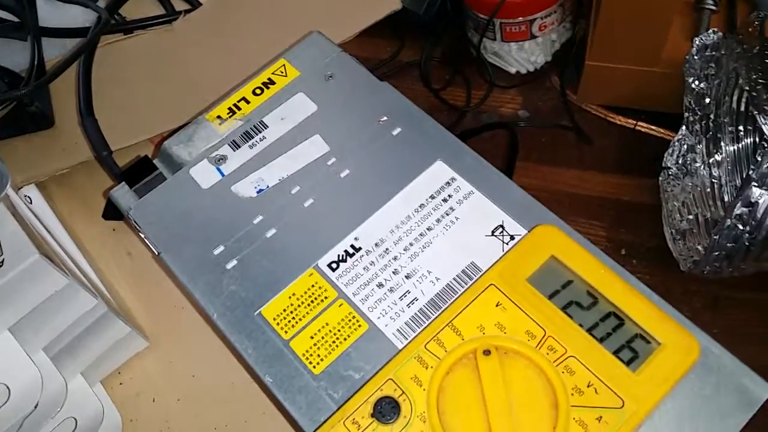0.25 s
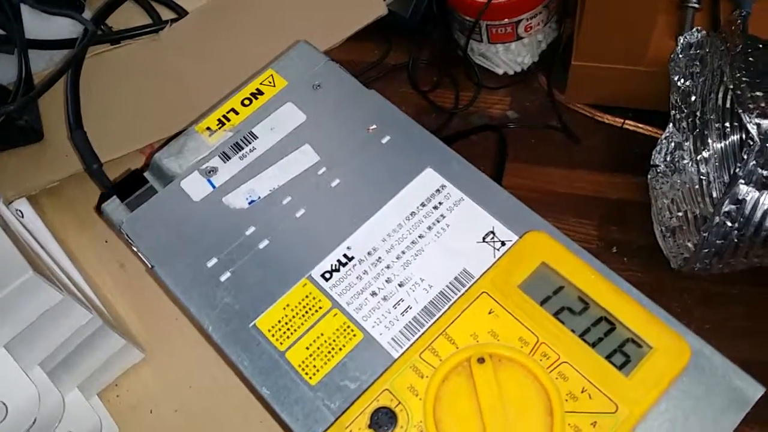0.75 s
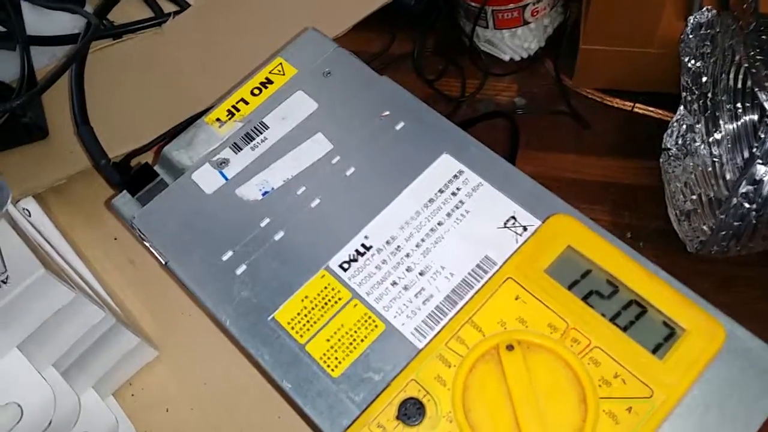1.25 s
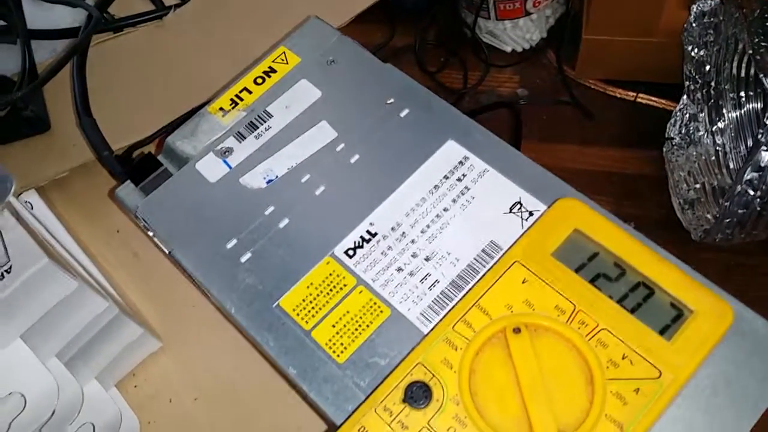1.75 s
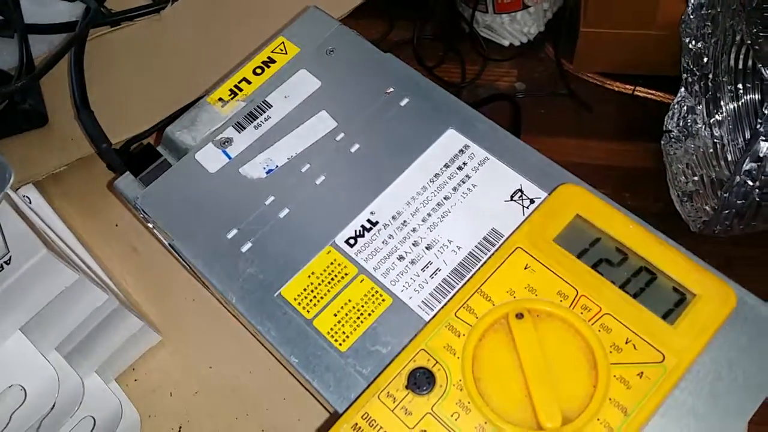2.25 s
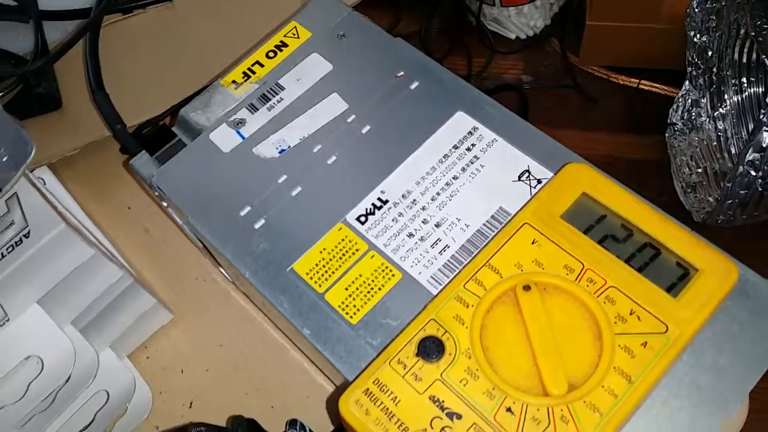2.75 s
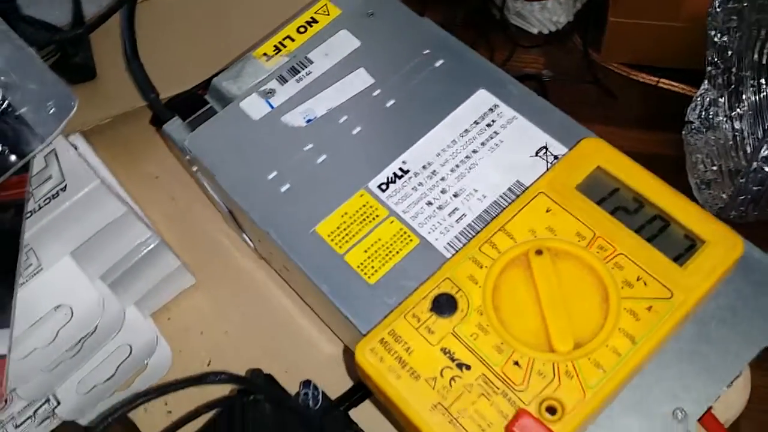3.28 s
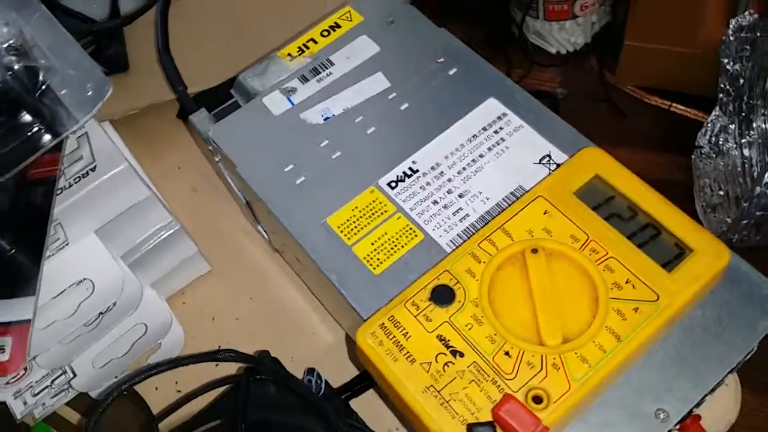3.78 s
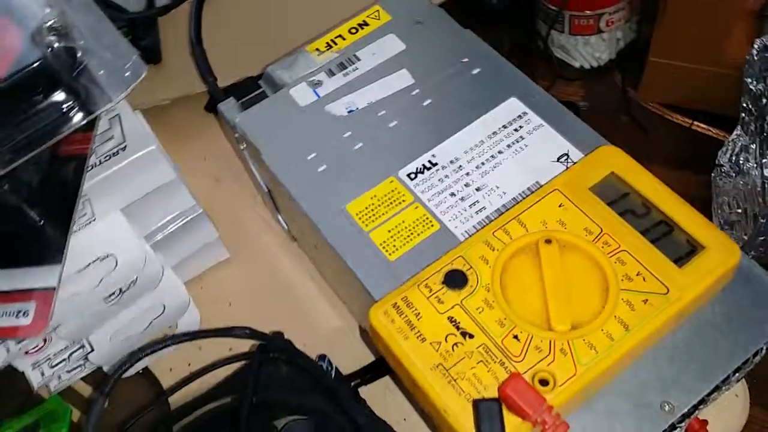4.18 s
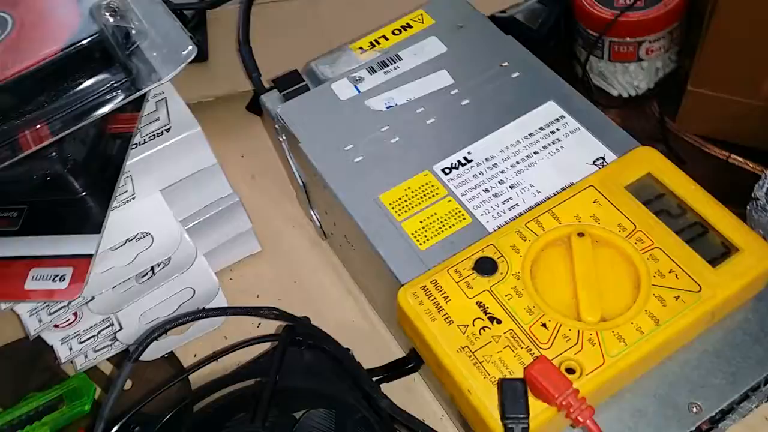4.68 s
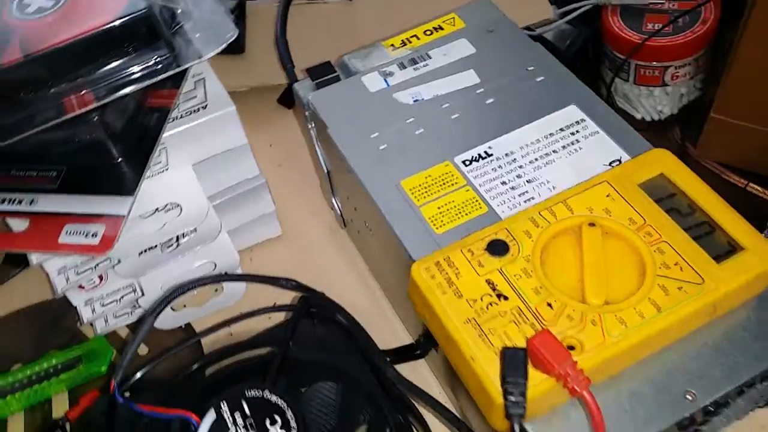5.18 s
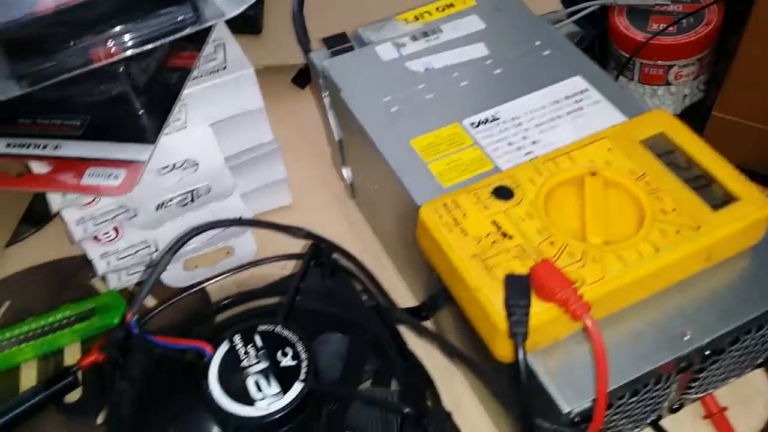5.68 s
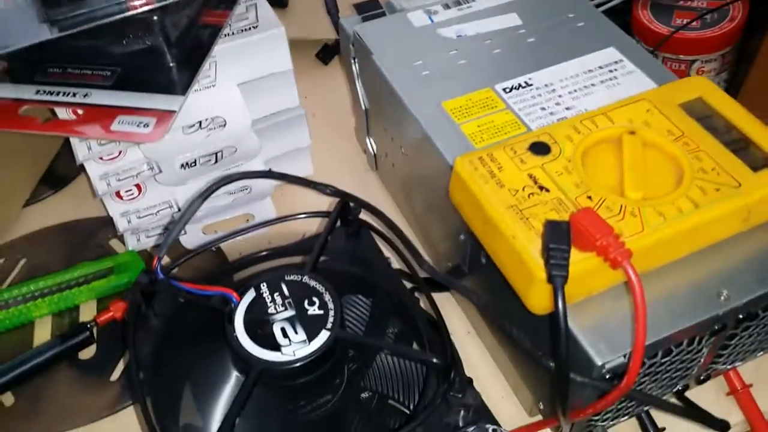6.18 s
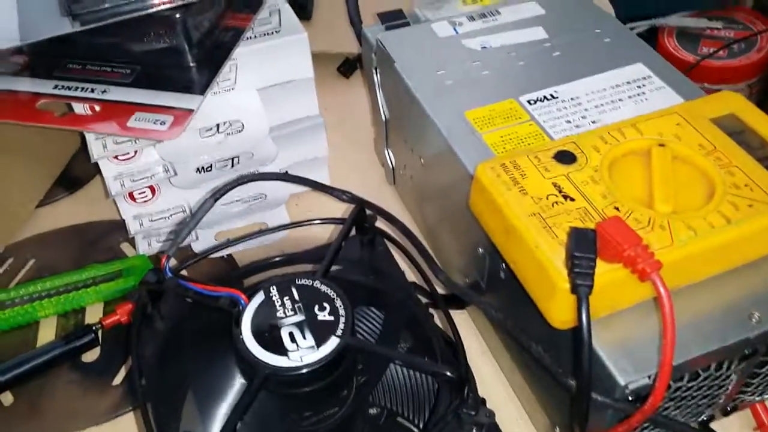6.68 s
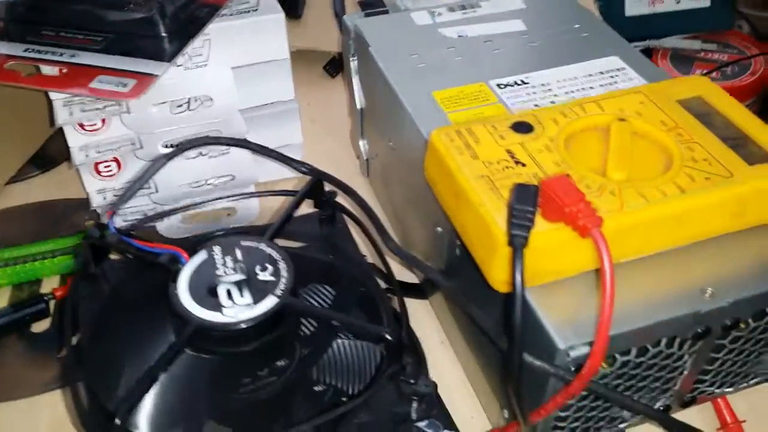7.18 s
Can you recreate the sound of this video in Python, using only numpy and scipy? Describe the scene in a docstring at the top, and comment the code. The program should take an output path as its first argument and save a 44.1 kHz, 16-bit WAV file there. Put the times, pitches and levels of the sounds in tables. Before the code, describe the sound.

From 0 seconds, small fans in a metal-cased unit are already running fast, close to a handheld stereo phone at an indoor workbench. Two strong whines near 1200 Hz beat quickly against each other, with shrill overtones and a dense rush of air. A third, lower whine climbs from about 590 to 745 Hz until 1.2 seconds, then all hold loud and steady. At about 3.2 seconds the drive is cut: the whines slide down together, ragged and fluttering, mostly within half a second, while the air rush lingers briefly. By 4 seconds they settle near 800 Hz and 540 Hz, with a small tonal swell, much softer. From 5 seconds to the end at about 7.4, the idle drone stays steady while the airy hiss gradually grows brighter and fuller as the microphone nears the outlet, with faint low draught puffs.

```python
"""Server fans coasting to idle

Three small seven-blade fans cool a server power supply on a workbench, close to a hand-held phone.
Two rotors whine at nearly the same high speed and beat; a third climbs for a second; all coast down to idle.
Rotor tones are sines on multiples of shaft speed; the air is noise coloured by the metal case;
a faint draught on the microphone is low-passed noise in soft puffs."""
import sys
import numpy as np
from scipy import signal
from scipy.fft import rfft, irfft
from scipy.io import wavfile

SR = 44100
rng = np.random.default_rng(int(sys.argv[2]) if len(sys.argv) > 2 else 0)


def inscribe(sig):
    """Save sig as 16-bit PCM at rate SR to the path in sys.argv[1].

    A 1-D sig is mono; a 2-D sig holds one channel per row.
    Samples are clipped to [-1, 1] before scaling.
    """
    pcm = np.round(np.clip(np.atleast_2d(sig).T, -1, 1) * 32767)
    wavfile.write(sys.argv[1], SR, pcm.astype(np.int16))


N = 328104
TIME_S = np.arange(N) / SR
FREQ_HZ = np.maximum(np.arange(N // 2 + 1) * SR / N, 1)

# Rotor tones before trims: multiple of shaft speed, full-speed left level/dB, right level/dB,
# idle left level/dB, right level/dB
FRONT_TONES = [(1, -51, -52, -66, -68), (4, -40, -43, -48, -54), (7, -23, -28.5, -33.5, -38),
               (8, -50, -58, -66, -62), (12, -41, -49, -60, -57), (14, -36, -36.5, -54, -52),
               (20, -52, -50, -45, -42), (21, -38.5, -31.5, -47, -49), (28, -33, -31, -43, -43),
               (35, -39.5, -28, -48, -42), (42, -44, -30, -45, -39), (49, -40.5, -43, -48, -39),
               (56, -48, -43, -54, -37), (63, -48, -54, -58, -56)]
REAR_TONES = [(2, -66, -66, -57, -57), (5, -56, -56, -51, -53), (7, -27, -38, -44, -44),
              (12, -43, -50, -58, -55), (14, -38, -34.5, -45, -46), (20, -62, -50, -45, -53),
              (21, -36.5, -32.5, -43, -47), (28, -35, -29.5, -40, -39), (35, -48, -31, -46, -39),
              (36, -50, -37, -60, -52), (42, -41, -41, -45, -37.5), (49, -45, -49, -50, -38.5),
              (56, -50, -49, -54, -43), (63, -57, -53, -51, -49)]
SLOW_TONES = [(4, -50, -50.5, -71, -75.5), (7, -28.5, -34.5, -29.5, -30.5), (8, -53, -38, -74, -74),
              (12, -55, -66, -42, -50), (14, -30.5, -33.5, -41, -47.5), (20, -55, -52, -32, -53),
              (21, -48, -62, -44.5, -80), (24, -71, -41, -63, -64), (28, -45, -50, -44, -46),
              (32, -46, -57.0, -53, -58), (35, -52.0, -43, -57, -71), (42, -42, -33, -54, -45),
              (49, -46, -34.5, -51, -37), (64, -61.0, -48, -58, -43.5)]
# Shaft speeds per rotor: start f/Hz, full f/Hz, idle f/Hz, coast time t/s, coast shape (1 = exponential)
SHAFTS = {"front": (168.85, 167.22, 111.33, .257, 1.16), "rear": (172.95, 170.95, 117.08, .243, 1.14),
          "slow": (84.4, 106.5, 76.7, .24, 1.14)}
# Hunting of the fast rotors about their set speed: t/s, shaft offset f/Hz
HUNTING = {"front": [(0, .08), (.5, -.08), (1, .1), (1.5, -.05), (2.1, .14), (2.8, -.08), (3.2, .02),
           (4.7, -.13), (5.6, 0), (7.4, .08)], "rear": [(0, -.18), (1.2, .05), (2.3, 0), (3.1, .25),
           (4.4, .1), (5, .27), (6, .05), (6.7, -.3), (7.4, -.22)]}
# Lag of each rotor's tones at the left port, bent by bench reflections: f/Hz, lag/rad
TONE_LAG = {"front": [(800, -.3), (1200, -.7), (2400, .8), (3100, 1.8), (5900, 1.9), (7000, .3)],
            "rear": [(800, -1.7), (1200, -2.5), (2400, .7), (3300, 3.2), (3600, 2.4), (4100, 3.9),
            (4820, 4.4), (4910, 6.3), (6000, 3.8), (9500, 5.8)], "slow": [(540, -.15), (750, -.35),
            (1490, -1), (2200, 1), (4900, 1.5)]}
# Swells and dips of single tones: rotor, multiple of shaft speed, centre t/s, half length t/s, level/dB
TONE_SWELLS = [("front", 21, 0.31, 0.87, 8), ("rear", 35, 0.7, 0.66, 8.1), ("slow", 7, 0.76, 0.077, 5.1),
               ("front", 28, 0.97, 0.5, 8.8), ("front", 42, 0.95, 0.25, -18), ("slow", 7, 1.1, 0.09, 5.5),
               ("slow", 14, 3.95, 0.53, 7.8), ("rear", 28, 3.28, .04, 4), ("front", 28, 3.48, .1, 8),
               ("front", 35, 3.33, .12, 5), ("slow", 7, 3.38, .07, 3), ("front", 21, 3.37, 0.054, -11),
               ("rear", 21, 3.7, .08, -6), ("rear", 21, 3.2, 0.057, 4.5), ("rear", 21, 3.8, 0.078, 3.8),
               ("rear", 14, 4.5, 0.43, 4.1), ("rear", 28, 4.9, 0.79, 6.1), ("rear", 56, 4.9, .6, 7),
               ("front", 20, 4.93, .7, 5.9), ("rear", 42, 5.35, 0.19, 5.5), ("slow", 21, 9.7, .9, 4.7),
               ("front", 56, 6.6, 0.55, -7), ("slow", 49, 6.3, 0.67, -16), ("rear", 35, 6.8, 0.87, 7.1)]
# Rushing air before case and trims: f/Hz, full-speed left level/dB per Hz, right level/dB per Hz,
# idle left level/dB per Hz, right level/dB per Hz
AIR_SPECTRUM = [(35.0, -104.8, -104.0, -103.6, -103.1), (79.5, -99, -103, -82, -86),
                (155, -70.5, -73, -73, -71), (330, -71, -71.5, -73, -75.5), (418, -63, -65, -66, -64.5),
                (1035, -56, -58, -61.5, -60), (1670, -61, -58.5, -66.5, -61.5),
                (3070, -61, -61, -65.5, -67.5), (4570, -59, -57, -64.5, -61.5),
                (6360, -61.5, -49.5, -67, -53.5), (7090, -61, -57.5, -66.5, -62.5),
                (10700, -68.5, -70, -73.5, -75.5), (12050, -70, -82, -78, -101.3),
                (13300, -81, -128.8, -101.5, -157.9)]
# Resonances and dips of case and bench: f/Hz, width f/Hz, left level/dB, right level/dB
CASE_MODES = [(239, 67, 5.5, 7), (500, 45, 4, 1), (565, 85, 8.5, 7), (696, 110, 2, -4),
              (824, 57, -1.5, -2.5), (1320, 320, 1, -1), (1500, 220, 5, -4.5), (1920, 300, -2.5, 3),
              (2310, 260, 4, 0), (2720, 300, -.5, 3.5), (3760, 200, 0, 4), (5300, 600, 2.5, 1)]
# Likeness of the noise at the two ports: f/Hz, correlation
PORT_LIKENESS = [(70, .4), (200, 0.88), (320, 0.6), (520, 0.96), (900, 0.53), (1400, 0.4), (1700, 0.33),
                 (2600, 0.41), (4500, 0.17), (6200, .22), (8000, 0.064), (12000, 0.061)]
# Lag of the shared noise at the left port, bent by bench reflections: f/Hz, lag/rad
AIR_LAG = [(300, 0), (800, .2), (1100, .6), (1400, 1.6), (1600, 2.8), (1800, 3.8), (2000, 5.5), (2300, 6.3),
           (3200, 8.5), (4500, 8.6), (6000, 10.7), (12000, 12.5)]
# Strongest puffs on the microphone, before the draught gain: t/s, level/dB
PUFFS = [(.64, -56), (1.06, -54), (2.95, -58), (3.38, -59), (3.73, -59), (3.86, -49), (4.85, -54),
         (5.33, -59), (6.47, -52), (7.32, -52)]

BLADES = 7
CLIMB_S, CUT_S = 1.2, 3.24  # climb ends; drive is cut back
SETTLE_S, SETTLE_HALF_S = 4.14, 0.31  # blade tones swell as the rotors settle at idle
MOVE_S, MOVE_LENGTH_S = 5.04, 3  # phone moves round towards the outlet
COAST_WAVER, COAST_FLUTTER_DB = 0.005, 1.0  # waver is a fraction of shaft speed
RING_HZ, RING_WIDTH_HZ, RING_DB = 4100, 1500, 6  # case band that rings during the coast
DRIFT_DB, DRIFT_PER_S = 0.37, 0.91  # slow overtone drift among standing waves
PUFF_HALF_S = 0.028
TOP_HZ = 13600


def rotor(name, blade_db, overtone_db, tones, gain_db, jitter, flutter_db, shimmer_db, coast_db):
    """Blades chop air at the struts; unequal blades and the motor add other multiples of shaft speed."""
    shaft_hz = shaft_speed(name)
    drive = throttle(shaft_hz)
    coast = 4 * drive * (1 - drive)  # peaks midway down: tones turn ragged, overtones burst
    overtone_db = overtone_db + coast_db * coast
    shimmer_db = shimmer_db + COAST_FLUTTER_DB * coast

    waver = jitter * walk(10.0) + COAST_WAVER * coast * walk(48.0)
    angle = 2 * np.pi * np.cumsum(shaft_hz * (1 + waver)) / SR
    eddies = walk(32.0)
    drift_db = DRIFT_DB * walk(DRIFT_PER_S)

    out = np.zeros((2, N))
    for multiple, *levels_db in tones:
        tone_hz = multiple * shaft_hz
        full_db, idle_db = np.reshape(levels_db, (2, 2, 1))
        # each tone meets the eddies and standing waves at its own moments
        shift = rng.integers(N)
        flutter = np.roll(eddies, shift)
        if multiple == BLADES:
            trim_db = blade_db + flutter_db * flutter
        else:
            ring_db = RING_DB * coast * np.exp(-(2 * (tone_hz - RING_HZ) / RING_WIDTH_HZ) ** 2)
            trim_db = overtone_db + shimmer_db * flutter + np.roll(drift_db, shift) + ring_db
        swell_db = tone_swell_db(name, multiple)
        level_db = gain_db + idle_db + drive * (full_db - idle_db) + trim_db + swell_db

        left_lag_rad = np.interp(tone_hz, *np.transpose(TONE_LAG[name]))
        lag_rad = np.array([left_lag_rad, np.zeros(N)])
        start_rad = rng.uniform(0, 2 * np.pi)
        out += undb(level_db) * np.sin(multiple * angle - lag_rad + start_rad)
    return np.sqrt(2) * out  # levels are RMS


def shaft_speed(name):
    """Shaft speed in Hz: a straight ramp to full speed, a hold, a coast to idle, plus any hunting."""
    start_hz, full_hz, idle_hz, coast_s, shape = SHAFTS[name]
    driven_hz = start_hz + (full_hz - start_hz) * ramp(0, CLIMB_S)
    hunt_hz = np.interp(TIME_S, *np.transpose(HUNTING[name])) if name in HUNTING else 0
    decay = np.exp(-(np.maximum(TIME_S - CUT_S, 0) / coast_s) ** shape)
    return idle_hz + hunt_hz + (driven_hz - idle_hz) * decay


def throttle(shaft_hz):
    """Highest speed still to come, scaled: near 1 while driven hard, falling to 0 at idle."""
    reach_hz = np.maximum.accumulate(shaft_hz[::-1])[::-1]
    return (reach_hz - reach_hz[-1]) / (reach_hz[0] - reach_hz[-1])


def tone_swell_db(name, multiple):
    """Summed bell-shaped swells and dips of one tone, in dB."""
    swell_db = np.zeros(N)
    for rotor_name, order, centre_s, half_s, db in TONE_SWELLS:
        if (rotor_name, order) == (name, multiple):
            swell_db += db * bump(centre_s, half_s)
    return swell_db


def blade_trim(start_db, full_db, idle_db, settle_db):
    """Blade-tone trim in dB, moving through climb and coast, with a swell on settling."""
    running_db = start_db + (full_db - start_db) * ramp(0, CLIMB_S)
    staged_db = running_db + (idle_db - running_db) * ramp(CUT_S, SETTLE_S - CUT_S)
    return staged_db + settle_db * bump(SETTLE_S, SETTLE_HALF_S)


def overtone_trim(start_db, full_db, idle_db, near_db):
    """Overtone trim in dB: the same stages, and a change as the phone nears the outlet."""
    return blade_trim(start_db, full_db, idle_db, 0) + near_db * ramp(MOVE_S, MOVE_LENGTH_S)


def air(drive, full_db=0.84, idle_db=0.5, hiss_hz=4000, low_cut_hz=95, churn_db=1.01, climb_db=2.0,
        linger_db=5.5, linger_s=0.45, hiss_full_db=-2.13, hiss_idle_db=-3.0, hiss_near_db=5.5,
        body_hz=260, body_near_db=3):
    """Turbulence rushes through case and grille, softer at idle, brighter and fuller near the outlet."""
    case_db = np.zeros((2, len(FREQ_HZ)))
    for hz, width_hz, left_db, right_db in CASE_MODES:
        case_db += np.array([[left_db], [right_db]]) / (1 + (2 * (FREQ_HZ - hz) / width_hz) ** 2)
    low_cut = 1 / np.sqrt(1 + (low_cut_hz / FREQ_HZ) ** 8)
    noise = port_noise() * undb(case_db) * low_cut
    full, idle = irfft(noise * undb(spectra(AIR_SPECTRUM).reshape(2, 2, -1)), N)
    flow = drive * undb(full_db) * full + (1 - drive) * undb(idle_db) * idle

    # split into hiss, rush and low body
    hiss = irfft(rfft(flow) * FREQ_HZ ** 2 / (FREQ_HZ ** 2 + hiss_hz ** 2), N)
    body = irfft(rfft(flow) / (1 + (FREQ_HZ / body_hz) ** 4), N)
    near = ramp(MOVE_S, MOVE_LENGTH_S)
    rush = flow - hiss - body + body * undb(body_near_db * near)

    # rush builds as the slow rotor climbs, lingers a moment after the cut
    climb_trim_db = climb_db * (ramp(0, CLIMB_S) - 1)
    linger_trim_db = linger_db * (1 - drive) * bump(CUT_S, linger_s)
    rush_db = climb_trim_db + linger_trim_db + churn_db * walk(20)
    hiss_db = hiss_idle_db + drive * (hiss_full_db - hiss_idle_db) + hiss_near_db * near
    return rush * undb(rush_db) + hiss * undb(hiss_db)


def draught(drive, gain_db=-2, centre_hz=92, full_db=-82, idle_db=-69, near_db=7, gust_db=1.5,
            gusts_per_s=6):
    """Stray air buffets the microphone: low noise, stronger at idle and near the outlet, plus puffs."""
    ratio = FREQ_HZ / centre_hz
    rumble = irfft(port_noise() * ratio ** 3 / (1 + ratio ** 8), N)
    speed_db = idle_db + drive * (full_db - idle_db)
    stray_db = speed_db + near_db * ramp(MOVE_S, MOVE_LENGTH_S) + gust_db * walk(gusts_per_s)
    puffs = sum(undb(db) * bump(s, PUFF_HALF_S) for s, db in PUFFS)
    return rumble / rumble.std() * undb(gain_db) * (undb(stray_db) + puffs)


def port_noise():
    """Noise spectra, 0 dB per Hz, at both ports: partly shared, the shared part lagging on the left."""
    shared, left, right = rfft(rng.standard_normal((3, N))) * np.sqrt(SR / 2)
    likeness = spectra(PORT_LIKENESS)[0]
    lag = np.exp(-1j * spectra(AIR_LAG)[0])
    common = np.array([shared * lag, shared])
    separate = np.array([left, right])
    return np.sqrt(likeness) * common + np.sqrt(1 - likeness) * separate


def walk(rate_per_s):
    """Smooth random wander of spread 1, changing about rate_per_s times a second."""
    wander = irfft(rfft(rng.standard_normal(N)) / (1 + (FREQ_HZ / rate_per_s) ** 4), N)
    return wander / wander.std()


def spectra(table):
    """Columns of a frequency table at every bin, interpolated over log frequency."""
    hz, *columns = np.transpose(table)
    return np.array([np.interp(np.log(FREQ_HZ), np.log(hz), column) for column in columns])


def ramp(start_s, length_s):
    """Straight rise from 0 to 1."""
    return np.clip((TIME_S - start_s) / length_s, 0, 1)


def bump(centre_s, half_s):
    """Bell shape of height 1, down to 1/e at half_s from its centre."""
    return np.exp(-((TIME_S - centre_s) / half_s) ** 2)


def undb(db):
    """Decibels to amplitude gain."""
    return 10 ** (np.asarray(db) / 20)


def scene():
    """Three rotors, their air and the draught."""
    front = rotor("front", blade_trim(start_db=2.5, full_db=-0.8, idle_db=0.0, settle_db=2.5),
                  overtone_trim(start_db=-3.0, full_db=-1.0, idle_db=0.0, near_db=-0.5),
                  FRONT_TONES, gain_db=-0.27, jitter=0.00018, flutter_db=0.5, shimmer_db=1.4, coast_db=-1.0)
    rear = rotor("rear", blade_trim(start_db=-2.5, full_db=0, idle_db=0, settle_db=7),
                 overtone_trim(start_db=1.5, full_db=0, idle_db=0, near_db=0.5),
                 REAR_TONES, gain_db=-0.2, jitter=0.0002, flutter_db=1.2, shimmer_db=1.2, coast_db=1.5)
    slow = rotor("slow", blade_trim(start_db=-2.5, full_db=1.85, idle_db=4.0, settle_db=3.0),
                 overtone_trim(start_db=-7.0, full_db=-1.8, idle_db=-2.15, near_db=2.0),
                 SLOW_TONES, gain_db=0.15, jitter=0.0004, flutter_db=0.6, shimmer_db=1.2, coast_db=-1)
    drive = throttle(shaft_speed("front"))
    return front + rear + slow + air(drive) + draught(drive)


def record(dry):
    """The phone cuts the top: a steep elliptic low-pass."""
    low_pass = signal.ellip(8, 0.1, 80, TOP_HZ, fs=SR, output="sos")  # order, ripple/dB, stopband/dB
    return signal.sosfilt(low_pass, dry)


dry = scene()
out = record(dry)
inscribe(out)
```